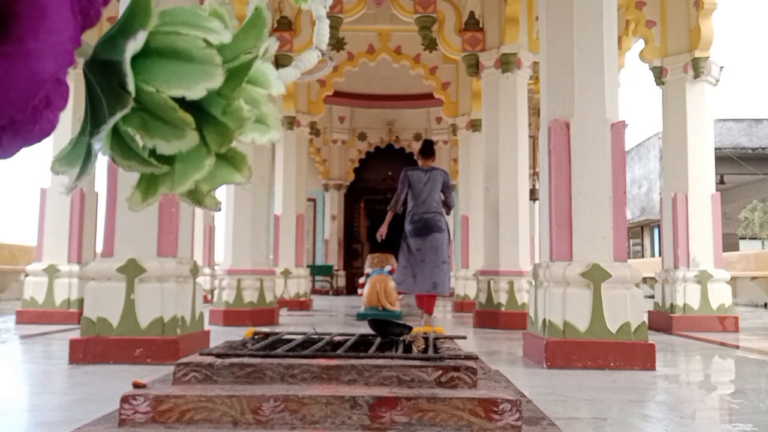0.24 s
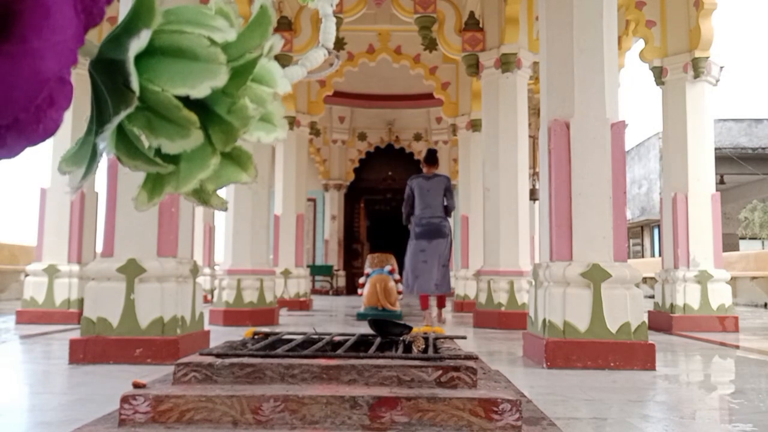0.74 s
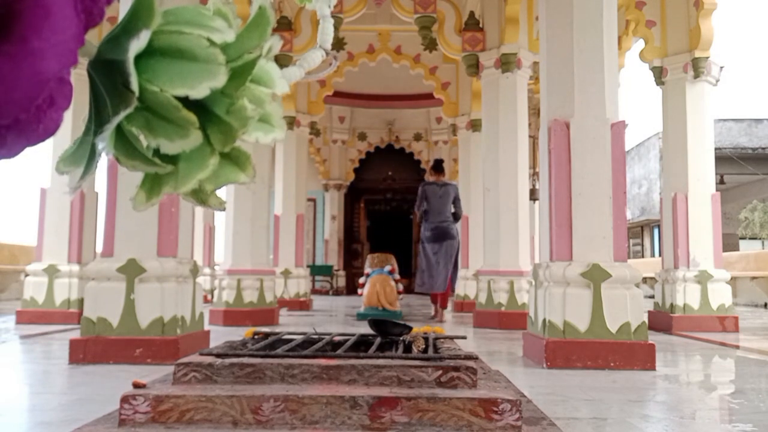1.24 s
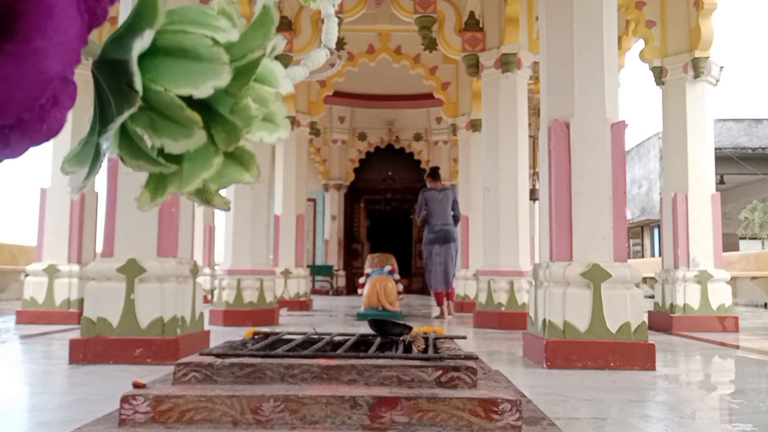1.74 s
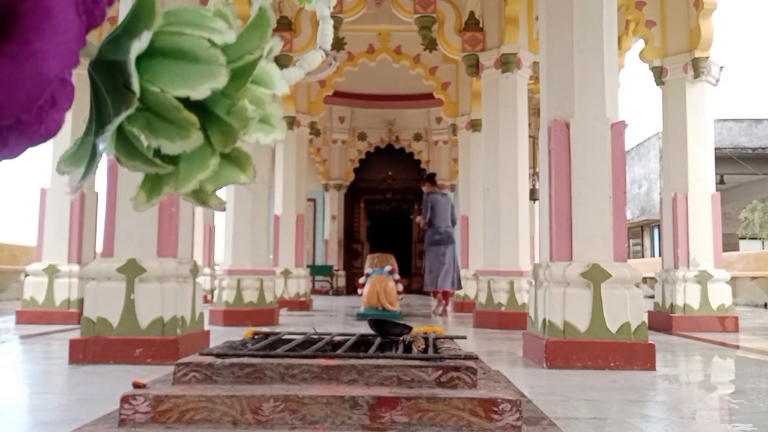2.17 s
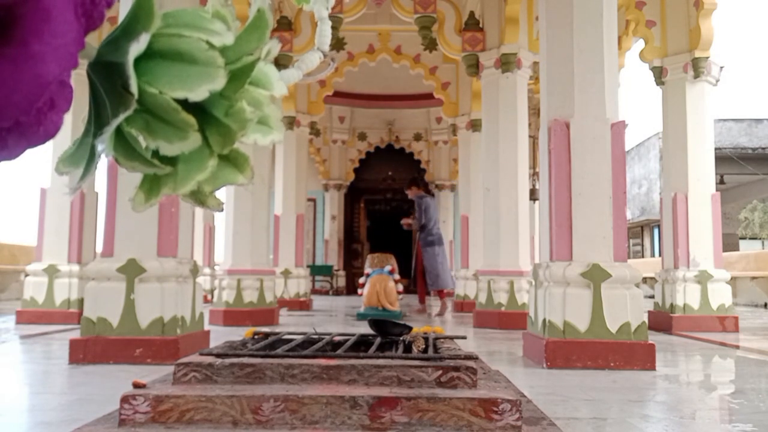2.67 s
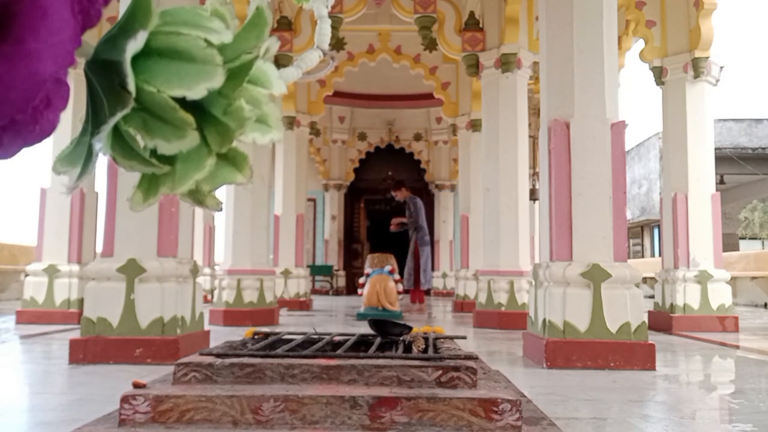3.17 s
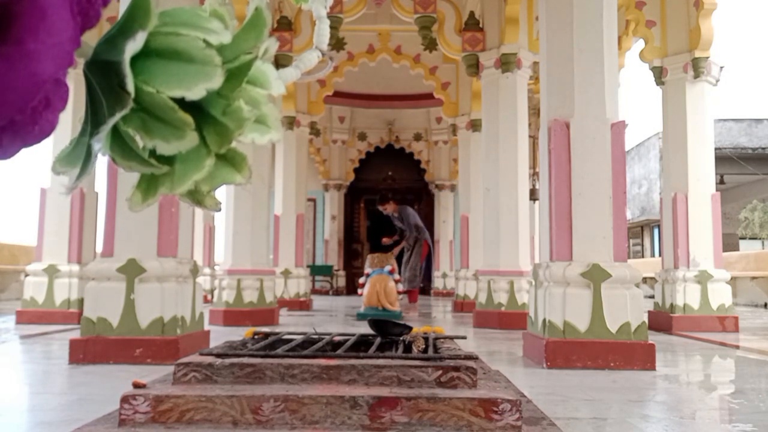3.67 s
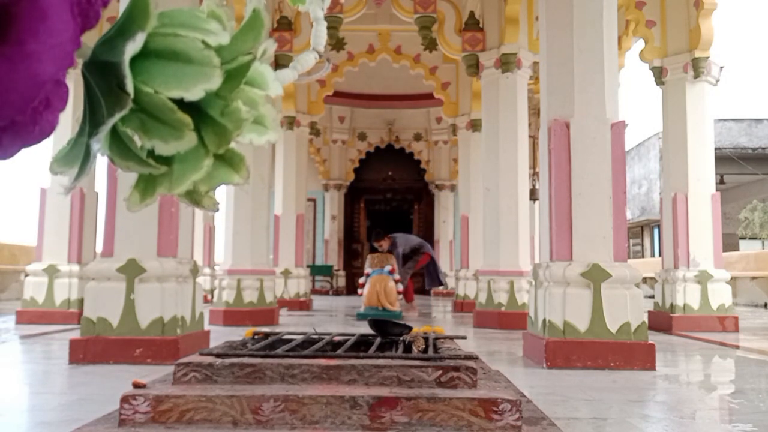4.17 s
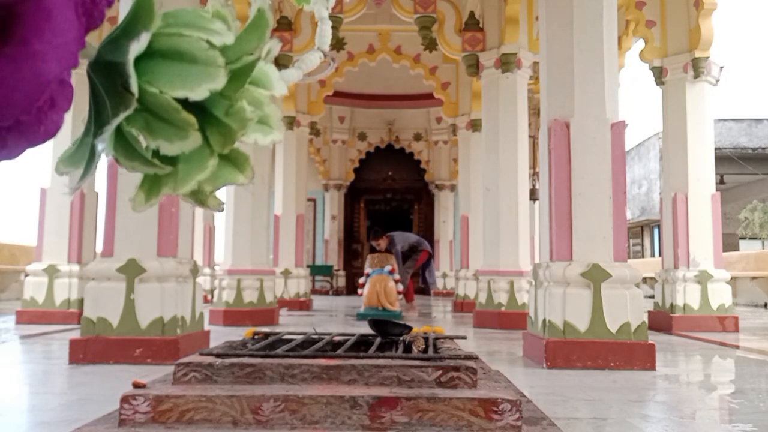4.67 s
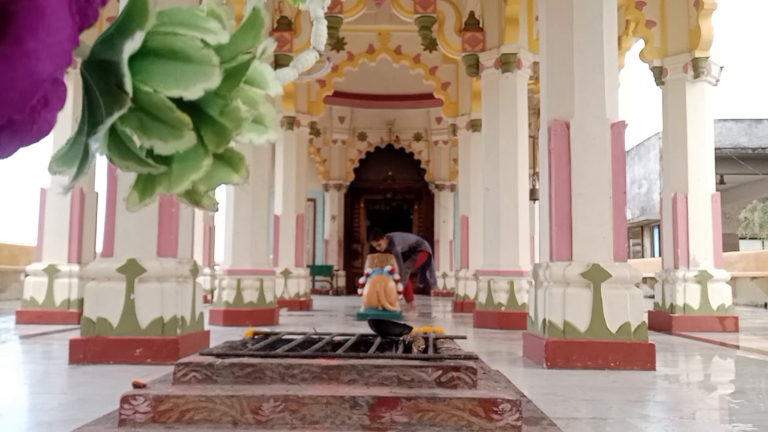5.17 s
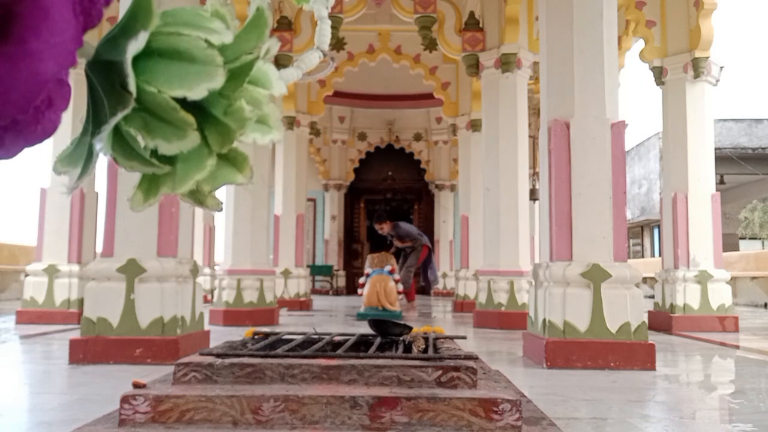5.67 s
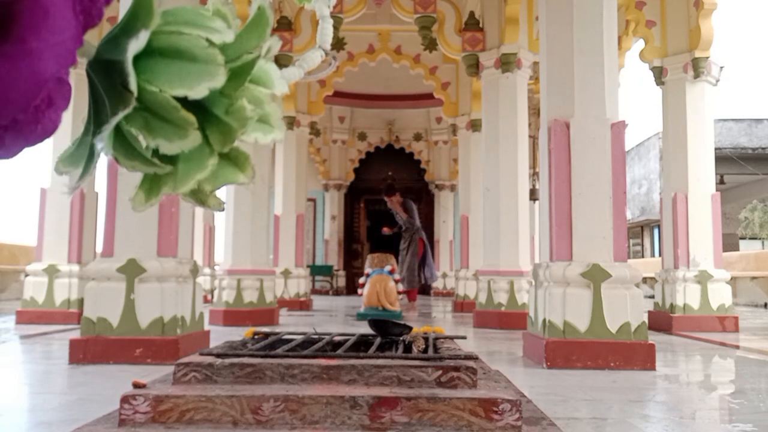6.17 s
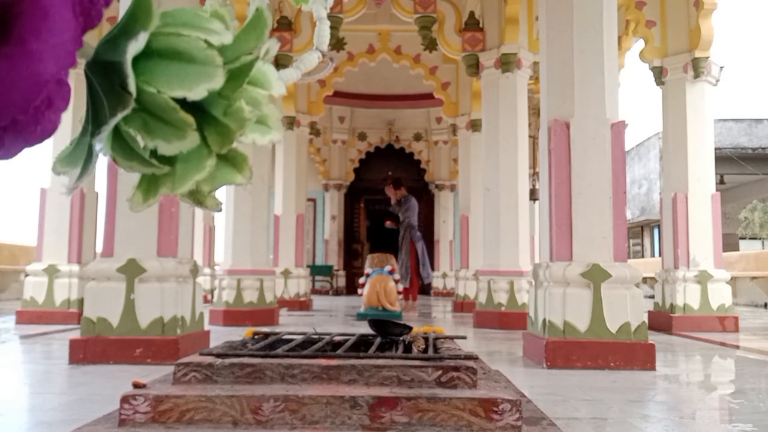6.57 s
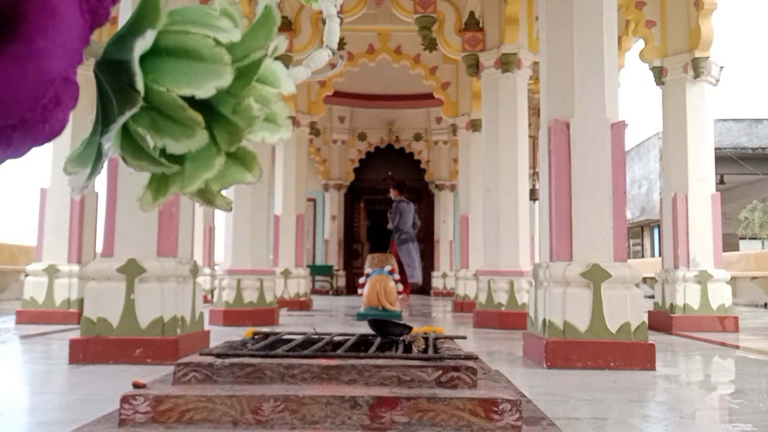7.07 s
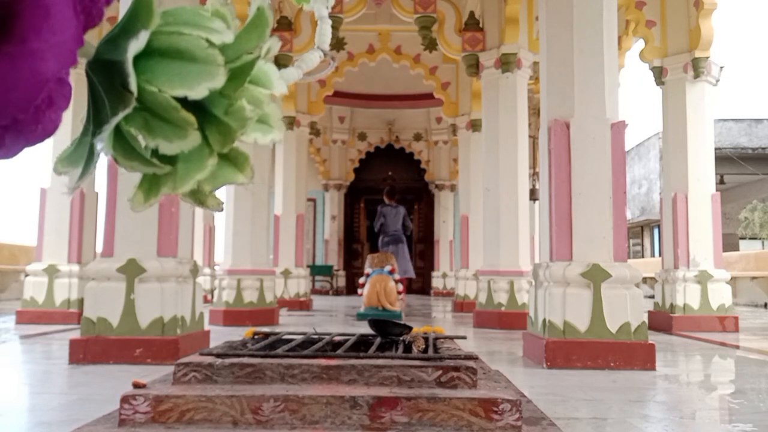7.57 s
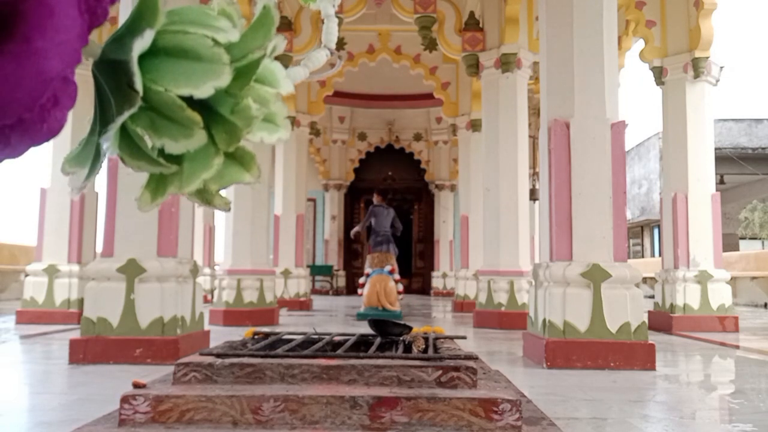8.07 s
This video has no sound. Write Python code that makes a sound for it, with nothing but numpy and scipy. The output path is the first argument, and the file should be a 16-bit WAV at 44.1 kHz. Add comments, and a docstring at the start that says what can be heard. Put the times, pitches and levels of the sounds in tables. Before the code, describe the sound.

In an open, pillared stone temple porch, many birds call without pause: short slurred whistles, sharp dry ticks and a harsh screech about once a second. A closer bird sings three quick glides near two and again past five seconds. Far engines hum low beneath soft air, one gathering speed and one slowing; a gentle swish passes near seven seconds. Wide stereo microphone, birds leaning left, with a bright ring.

```python
"""Birds around an open stone porch. From the start two far engines and a roar hum (sine lines, resonant noise) beneath
soft air noise, while slurred whistles (gliding sines) and dry ticks (decaying snaps over a rustle) ring in the vault.
From 0.76 s a harsh call (stacked sines, shaken falling rasp) comes about once a second; at 2.07 and 5.29 s the nearest
bird sings three glides. One engine gathers speed from 4.45 s, the other slows from 4.62 s; a noise swish passes at 7 s."""
import sys
import numpy as np
from scipy import signal
from scipy.fft import rfft, irfft
from scipy.io import wavfile
from scipy.ndimage import map_coordinates

SR = 44100
rng = np.random.default_rng(int(sys.argv[2]) if len(sys.argv) > 2 else 0)


def wrap_up_sound(samples):
    """Save the sound to the file named by the first command line argument, as 16-bit audio."""
    columns = np.atleast_2d(samples).T
    # keep every value between -1 and 1, then stretch to whole-number steps
    tamed = np.clip(columns, -1, 1)
    steps = np.round(tamed * 32767).astype(np.int16)
    wavfile.write(sys.argv[1], SR, steps)


N = 366471
T = np.arange(N) / SR

# spectrum of the outdoor air: (f/Hz, density level/dB)
AIR_SPECTRUM = [(25, -35), (50, -4.5), (90, 0.5), (150, 4), (240, -11.5), (500, -16), (700, -17.5),
                (1100, -15), (1500, -21.5), (2150, -17.5), (5700, -29), (8800, -43), (11200, -59),
                (15000, -65)]
# swell of the outdoor air before its common lift: (t/s, level/dB)
AIR_SWELL = [(0.0, -57), (2.08, -57), (2.42, -54), (3.54, -54), (4.77, -49), (4.79, -55), (5.89, -57.5),
             (5.95, -63.5), (6.8, -57)]
# course of the swish: (t/s, level/dB)
SWISH_COURSE = [(6.9, -67), (7.08, -42), (7.25, -38.5), (7.38, -43.5), (7.6, -49.5)]
# spectrum of the swish: (f/Hz, density level/dB)
SWISH_SPECTRUM = [(100, -23), (280, 2.5), (700, 2.5), (1450, -0.5), (1650, 4), (1800, 5), (2500, -1.5),
                  (5000, -7), (9000, -17), (12000, -50)]

# far engine that holds its speed, then lets off: (t/s, level/dB)
CRUISING_COURSE = [(0.0, -59), (0.04, -45.5), (0.93, -56), (0.97, -47), (2.71, -54), (3.82, -38.5),
                   (4.91, -42), (4.949, -65), (5.2, -79)]
# second engine that idles, then gathers speed: (t/s, level/dB)
SPEEDING_COURSE = [(0, -67), (2.8, -50), (4.6, -80), (5.6, -46), (6.0, -59), (7.0, -58.5), (7.8, -39.5),
                   (8.05, -49.5), (8.31, -49)]
# lines of each engine from the fifth multiple of its cycle rate upwards: (relative level/dB)
CRUISING_LINES = [-9.5, -34, -10, 4.5, -12.5, -23, -26]
SPEEDING_LINES = [4, 5.5, 3, -13, -12.5, -11.5, -9.5]
# cycle rates in Hz, their changes in Hz per second, and when those begin in s
CRUISE_HZ, CREEP_HZ_PER_S, LETS_OFF_S, SLOWING_HZ_PER_S = 17.5, .085, 4.62, 2.1
IDLE_HZ, PULLS_AWAY_S, GATHER_HZ_PER_S = 17.65, 4.45, 2.23
# swell of the traffic roar, of which only the swings count: (t/s, level/dB)
ROAR_SWELL = [(0.0, -55), (0.02, -54), (2.52, -49), (2.69, -54.5), (4.84, -46), (4.94, -57), (6.9, -69)]
# resonances of the roar, bass and above: (f/Hz, width/Hz, relative level/dB)
ROAR_BASS_MODES = [(70, 6.6, -0.5), (139.5, 43, 6.5)]
ROAR_UPPER_MODES = [(467.4, 37, 0), (524, 33, -3.5), (600, 22, -7), (885, 74, -12.5)]

# first echoes of floor, pillars and vault: (delay t/s, relative level/dB)
FIRST_ECHOES = [(.0096, -17), (.0154, -8), (.0173, 0), (.0397, -13)]
# ring of the porch, before it is stretched for each source: (f/Hz, fall by 60 dB t/s)
PORCH_RING = [(1000, 0.44), (2500, 0.96), (5000, 0.57), (8000, 0.54), (12000, 0.43)]
WALL_HZ = 9300  # where stone and air begin to dull the treble
PILLAR_ECHO_S, PILLAR_ECHO_DB = .047, -10

# sharp ticks: (t/s, relative level/dB, f/Hz, share sent into the ring/dB)
TICK_EVENTS = [(0.0364, -22.5, 4640, 1), (0.2833, -32, 5840, -1), (0.3521, -22, 6240, -1.5),
               (0.512, -35, 6500, -12), (0.576, -20.5, 5770, -1), (0.724, -27, 6600, 0.5),
               (.977, -26, 5860, -1), (1.094, -26.5, 6140, 1), (1.2065, -32.5, 6000, -11),
               (1.88, -24, 5330, -3), (1.9499, -31.5, 4080, 7), (2.021, -42.5, 5430, 8.5),
               (2.1844, -23, 7900, -4.5), (2.3166, -32, 7700, -2.5), (2.577, -37.5, 5600, 5.5),
               (2.6663, -34, 6000, 1), (2.689, -30, 7500, -19), (2.803, -41, 4900, -6),
               (3.044, -28.5, 5540, -4.5), (3.1066, -31, 5470, 0.5), (3.1538, -30, 5960, -1.5),
               (3.406, -36, 7260, 0), (3.723, -32, 7700, -6), (3.7408, -32, 6150, -1),
               (3.776, -31.5, 5600, -1), (3.8506, -36.5, 5970, 1), (3.9849, -30, 5700, 1.5),
               (4.1239, -24.5, 4400, -0.5), (4.32, -25, 5360, -1.5), (4.337, -26.5, 6600, -17),
               (4.6, -27.5, 5060, -4), (4.6747, -22, 6050, -1), (5.0518, -24, 4860, -1.5),
               (5.333, -17.5, 6200, -1.5), (5.4553, -27, 6340, 2), (5.8263, -28.5, 4700, -7),
               (6.0861, -33, 6300, -2), (6.148, -31.5, 5960, -2), (6.3088, -28, 5600, -3.5),
               (6.4814, -35.5, 6260, -6), (6.5502, -24.5, 6900, -2), (6.6082, -23, 5570, -4),
               (6.6642, -37, 5000, 9), (6.718, -27.5, 6600, -2), (6.771, -24.5, 9300, -3.5),
               (6.9196, -32.5, 4830, -2), (6.9883, -40, 6100, 6), (7.1994, -28, 5400, -3),
               (7.256, -23.5, 7100, -4), (7.514, -19, 6800, 0.5), (7.8048, -25.5, 4800, -5),
               (8.034, -38, 5550, -15), (8.2748, -30.5, 6100, -5)]
# harsh calls: (t/s, relative level/dB, f/Hz, upper voice f/Hz, held voices over the falling rasp/dB)
CALL_EVENTS = [(0.756, -47.5, 4970, 5250, 1.5), (1.71, -41, 4966, 5360, -0.5),
               (2.663, -44, 4930, 5410, -3.5), (4.021, -42.5, 4944, 5270, -2.5),
               (5.028, -46.5, 4864, 5220, -.5), (6.109, -48, 5000, 5240, 0.5), (7.03, -49, 5100, 5500, 0.5)]
# falling rasp of one call: (t/s from its start, pitch over the call's pitch, level/dB, rasp 0-1)
CALL_FALL = [(0, .96, -14, .6), (.016, .97, -7, .5), (.04, .94, -7, .8), (.06, .83, -4, 1),
             (.08, .81, -2, .8), (.135, .84, -2, .9), (.17, .83, -8, .7)]
# held voices of a call: (pitch over the call's pitch, entry t/s, length t/s, level/dB, unsteadiness of pitch)
HELD_VOICES = [(1, 0, .125, 0, .009), (.96, 0, .11, -7, .03), (.937, .08, .09, -4, .011),
               (.87, .085, .085, -5, .014), (.81, .065, .08, -6, .017), (.755, .07, .08, -9, .025),
               (1.31, 0, .13, -10, .035)]

# single whistles: (t/s, length t/s, middle f/Hz, glide/octaves, relative level/dB, rasp 0-1)
WHISTLE_NOTES = [(.004, 0.051, 2310, .18, -34, 0.87), (0.025, .028, 2295, .09, -25, 0.4),
                 (0.072, 0.019, 2880, -0.22, -32, 0.2), (.085, 0.074, 2740, -0.03, -40, 0.03),
                 (0.17, 0.042, 2760, 0, -38, 0.07), (0.215, 0.0096, 2605, -0.56, -23.5, 0),
                 (.221, 0.013, 2155, -.02, -26, 0.14), (.236, .065, 2360, .08, -45, 0.77),
                 (0.344, 0.036, 2100, .25, -42, 0.7), (.375, 0.041, 2030, -0.134, -49, 0.42),
                 (0.651, 0.015, 3520, 0, -44, 0.08), (.69, 0.036, 3500, 0, -46, 0.2),
                 (1.012, 0.046, 1860, -0.11, -49, 0.14), (1.195, 0.035, 2750, -0.03, -56, 0),
                 (1.236, 0.035, 2194, 0.32, -46.5, .3), (1.403, 0.031, 2440, -.25, -55, 0.25),
                 (1.447, 0.05, 1950, -.1, -43.5, .2), (1.491, 0.062, 2210, -0.28, -52.5, .5),
                 (1.531, 0.047, 1937, .02, -45, 0.26), (1.483, 0.31, 4730, 0, -55, 0.11),
                 (1.853, 0.039, 2282, .16, -43, 0.4), (1.94, 0.22, 4800, -0.048, -56.5, 0.15),
                 (2.212, 0.028, 2320, .15, -40, 0.24), (2.467, 0.036, 2320, -.12, -37, 0.37),
                 (2.523, 0.013, 2720, .3, -24, 0.51), (2.548, 0.0097, 3230, .3, -30.5, .05),
                 (2.57, 0.021, 2750, .2, -57, 0.07), (2.594, 0.021, 3220, -0.17, -38, .2),
                 (3.001, 0.026, 2505, 0.26, -29.5, 0), (3.194, 0.079, 1963, .039, -43, 0.08),
                 (3.195, 0.038, 1790, 0.075, -40, 0.08), (3.423, 0.037, 2370, -0.078, -26, 0.09),
                 (3.454, 0.038, 1940, -0.071, -46, 0.73), (3.481, 0.14, 2930, 0.42, -48, 0.55),
                 (3.645, 0.12, 2350, -0.18, -42, 0.57), (3.875, 0.062, 3372, 0.11, -42.5, 0.57),
                 (3.935, 0.057, 3635, -.01, -44, 0.2), (4.032, 0.0436, 2500, 0.22, -25.5, 0.41),
                 (4.074, 0.053, 2670, 0.087, -36, 0.4), (4.497, 0.14, 2000, 0.11, -49.5, 0),
                 (4.604, 0.082, 2600, 0.5, -39, 0.37), (4.711, .027, 3280, -.03, -34, 0.13),
                 (4.754, 0.03, 3270, -0.017, -51, 0.02), (4.726, 0.071, 2090, -0.13, -44.5, 0.4),
                 (4.917, 0.033, 1770, 0.1, -45, 0.14), (5.085, 0.046, 2100, 0.3, -49, .1),
                 (5.193, 0.019, 3290, -0.019, -44, 0.1), (5.212, .011, 2700, -0.37, -40, .03),
                 (5.574, 0.047, 2090, -.04, -35, .3), (6.185, 0.048, 3070, .091, -51, 0.5),
                 (6.378, 0.08, 2220, 0.14, -54, 0.8), (6.488, .045, 2950, -.16, -51, 0.26),
                 (6.827, 0.087, 1960, 0.15, -47.5, 0.14), (6.885, 0.073, 2850, -0.0099, -55.5, 0.06),
                 (7.067, 0.029, 2470, 0, -28.5, 0.01), (7.127, 0.25, 1644, -0.046, -50.5, .1),
                 (7.452, 0.051, 2480, 0.45, -37, 0.3), (7.517, 0.032, 2500, 0.28, -48, .4),
                 (7.567, .038, 2170, -.2, -34, 0.54), (7.61, 0.048, 2120, -0.29, -31, 0.6),
                 (7.671, 0.046, 1976, -0.071, -38, 0.18), (7.664, .15, 2355, -.15, -54, 0.7),
                 (7.725, 0.048, 1860, -0.063, -42, 0), (7.803, 0.032, 2050, -.2, -28.5, 0.45),
                 (7.857, 0.037, 2044, .15, -55, 0), (7.98, .035, 2780, .03, -57, 0.1),
                 (8.024, 0.029, 2575, .01, -43, 0.03), (8.048, 0.015, 2335, -.02, -37, 0),
                 (8.056, 0.0095, 2515, .24, -45, 0.2), (8.14, 0.037, 2350, -.1, -54, 0.3),
                 (8.173, 0.071, 2080, -0.038, -45.5, 0.17), (8.221, .018, 2330, 0.37, -38, 0.13),
                 (8.255, .05, 2200, -0.3, -57, .4)]
BEND = 0.091  # a glide lingers at its low end by this share of its span
# the three figures of the nearest bird's song: (t/s into the figure, f/Hz, level/dB)
OPENING = [(0, 2700, -15), (.012, 2760, -6), (.022, 2600, 1), (.032, 2330, -1), (.04, 2700, 1),
           (.046, 3250, -8), (.05, 3350, -18)]
DROP = [(0, 3050, -14), (.005, 2800, -3), (.01, 2450, 1), (.019, 2200, -3), (.029, 2080, -8),
        (.042, 1850, -16)]
SWEEP = [(0, 2400, -8), (.006, 2270, 0), (.011, 2800, -2), (.018, 3300, -9), (.03, 2990, -7),
         (.052, 2770, -1), (.072, 2600, 0), (.098, 2380, -5), (.122, 2260, -14)]
# syllables of the song: (t/s, figure, stretch in time, width of the glides, level/dB)
SYLLABLES = [(2.066, OPENING, 1, 1, -28), (2.250, DROP, 1, 1, -29.5), (2.347, SWEEP, 1, 1, -30),
             (5.294, OPENING, 1.05, .9, -30.5), (5.478, DROP, 1, 1.05, -28.5),
             (5.545, SWEEP, 1.02, .75, -27)]
SONG_HZ = 2400  # pitch about which the song's glides are widened or narrowed

# colour of the two microphone ports: (f/Hz, level/dB)
LEFT_COLOUR = [(400, 0), (1200, -1), (2400, 2.5), (4500, 5), (6500, 6), (7600, 6.5), (9000, -20),
               (11000, -18.5), (15000, -21)]
RIGHT_COLOUR = [(400, 0), (1200, -3), (2400, -1), (4500, 3.5), (6500, -1.5), (8600, 5.5), (9600, 1),
                (11000, -6.5), (15000, -20)]
TOP_HZ = 15700  # nothing above this is let through


def undb(db):
    """Decibels to gain."""
    return 10 ** (np.asarray(db) / 20)


def unit(x):
    """Scale to rms 1."""
    return x / np.sqrt(np.mean(x ** 2) + 1e-20)


def curve(rows):
    """Second column of a table joined by straight lines in time."""
    rows = np.array(rows)
    return np.interp(T, rows[:, 0], rows[:, 1])


def shape(x, gain):
    """Filter by a gain that is a function of frequency."""
    return irfft(rfft(x) * gain(np.fft.rfftfreq(x.shape[-1], 1 / SR) + 1e-3), x.shape[-1])


def colour(x, points):
    """Filter by a spectrum of (f/Hz, level/dB) points."""
    hz, db = np.transpose(points)
    return shape(x, lambda f: undb(np.interp(np.log(f), np.log(hz), db)))


def wander(rate, size):
    """Smooth random drift with a spread near 1, through `rate` random points a second."""
    points = rng.standard_normal(int(size / SR * rate) + 4)
    return map_coordinates(points, [np.arange(size) / SR * rate + 1], order=3, mode="nearest")


def tone(hz):
    """A sine that follows a pitch curve."""
    return np.sin(2 * np.pi * np.cumsum(hz) / SR)


def add(track, start, sound):
    """Mix a sound into a track at a time."""
    i = max(int(start * SR), 0)
    part = sound[:max(N - i, 0)]
    track[i:i + len(part)] += part


def delay(x, seconds):
    """The same sound, later."""
    return np.concatenate([np.zeros(int(round(seconds * SR))), x])[:N]


def porch_tail(build_s, linger):
    """Decaying noise, unlike at the two ports, whose bands die away at their own rates."""
    t = T[:int(1.3 * SR)]
    noise = rng.standard_normal((2, len(t)))
    # single reflections stand out early on, then merge
    sparseness = np.exp(-t / 0.15)
    noise = noise * (np.abs(noise) / np.sqrt(np.pi)) ** sparseness
    hz, t60 = np.transpose(PORCH_RING)
    tail = 0
    for share, decay in zip(np.eye(len(hz)), t60):
        band = shape(noise, lambda f: np.interp(f, hz, share))
        tail = tail + band * np.exp(-np.log(1000) * t / (decay * linger))
    build = 1 - np.exp(-(t / build_s) ** 2)
    return unit(tail * build) / np.sqrt(len(t))


def porch(x, echo_db, ring_db, pan_db, build_s=0.007, linger=1.0, feed=None):
    """Direct sound and first echoes reach the right port first; the diffuse ring differs at the two ports."""
    wall = lambda f: 1 / np.sqrt(1 + (f / WALL_HZ) ** 6)
    dulled = shape(x, wall)
    sent = dulled if feed is None else shape(feed, wall)
    echoes = sum(undb(db) * delay(dulled, s) for s, db in FIRST_ECHOES)
    early = x + undb(echo_db) * echoes
    ports = np.array([delay(early, .00034), early])
    balance = undb(np.array([[pan_db], [-pan_db]]) / 2)  # positive leans left
    ring = signal.fftconvolve(sent[None], porch_tail(build_s, linger), axes=1)[:, :N]
    return ports * balance + undb(ring_db) * ring


def swish():
    """One soft broad pass of coloured noise, independent at the two ports."""
    gate = (T > SWISH_COURSE[0][0]) & (T < SWISH_COURSE[-1][0])
    noise = unit(colour(rng.standard_normal((2, N)), SWISH_SPECTRUM))
    return noise * undb(curve(SWISH_COURSE)) * gate


def outdoors(wide_hz=520, bass_db=-49, bass_hz=200, air_db=12):
    """Noise as a steady far rumble below air that swells and widens towards the treble."""
    mid, side = colour(rng.standard_normal((2, N)), AIR_SPECTRUM)
    side = shape(side, lambda f: np.clip(f / wide_hz, .22, .95))
    air = (mid + side * np.array([[1], [-1]])) / np.std(mid)
    bass = shape(air, lambda f: 1 / (1 + (f / bass_hz) ** 4))
    swell = undb(air_db + curve(AIR_SWELL) + .8 * wander(5, N))
    return undb(bass_db) * bass + swell * (air - bass)


def engine(speed, loudness, orders, unsteady=0.0042, flutter_db=2):
    """Low lines at multiples of a far engine's cycle rate; each flutters on its way through the air."""
    turns = np.cumsum(speed * (1 + unsteady * wander(9, N))) / SR
    lines = np.zeros(N)
    for multiple, db in enumerate(orders, start=5):
        flutter = undb(db + flutter_db * wander(16, N))
        lines += flutter * np.sin(2 * np.pi * (multiple * turns + rng.random()))
    return unit(lines) * undb(curve(loudness))


def resonances(modes):
    """Noise ringing in a few resonances, rms 1."""
    total = np.zeros(N)
    for hz, width, db in modes:
        peak = lambda f: 1 / (1 + ((f - hz) / width * 1.92) ** 2)
        total += undb(db) * unit(shape(rng.standard_normal(N), peak))
    return unit(total)


def roar(low_db=-54, high_db=-54.5, spread=0.36, low_swell=0.91, high_swell=1.13):
    """Resonant traffic noise: central bass that swells less than the more diffuse part above it."""
    level = curve(ROAR_SWELL)
    swell_db = level - level[T < LETS_OFF_S].mean()
    low = resonances(ROAR_BASS_MODES) * undb(low_db + low_swell * swell_db)
    high = resonances(ROAR_UPPER_MODES) + spread * resonances(ROAR_UPPER_MODES) * np.array([[1], [-1]])
    return low + undb(high_db + high_swell * swell_db) * high


def hum():
    """Distant traffic: two droning engines, alike at both ports, and a roar."""
    slowing = SLOWING_HZ_PER_S * np.clip(T - LETS_OFF_S, 0, 1)  # slows for one second
    cruising_hz = CRUISE_HZ + CREEP_HZ_PER_S * T - slowing
    speeding_hz = IDLE_HZ + GATHER_HZ_PER_S * np.maximum(T - PULLS_AWAY_S, 0)
    cruising = engine(cruising_hz, CRUISING_COURSE, CRUISING_LINES)
    speeding = engine(speeding_hz, SPEEDING_COURSE, SPEEDING_LINES)
    return cruising + speeding + roar()


def snap(db, hz, ring_s=.00009, splinter_db=-5):
    """A sine burst a few cycles long, then a softer copy of it a moment later."""
    t = T[:128]
    softness = undb(-.2 * np.clip(db + 18, -15, 0))  # weaker snaps are blunter
    rise = t / (softness * ring_s / 2)
    burst = undb(db) * rise * np.exp(1 - rise) * np.sin(2 * np.pi * hz * t)
    splinter_s = rng.uniform(.0004, .0014)
    return burst + undb(splinter_db) * np.interp(t - splinter_s, t, burst)


def ticks(loud_db=3.14, crackle_count=5, crackle_db=-19, crackle_s=.04,
          grain_count=420, grain_db=-46, grain_range_db=12, grain_hz=6300):
    """Short snaps, each trailed by fainter crackles, over a soft rustle of scattered tiny snaps."""
    loud = [(start, db + loud_db, hz, send_db) for start, db, hz, send_db in TICK_EVENTS]
    grains = []
    for u, v, w in rng.random((grain_count, 3)):
        grains.append((u * N / SR, grain_db + grain_range_db * (v - .5), grain_hz * 2 ** (w - .5), 0))
    crackles = []
    for start, db, hz, send_db in loud:
        for u, v, w in rng.random((crackle_count, 3)):
            later = start - crackle_s * np.log(1 - u)  # thinning out after the snap
            crackle_level = db + crackle_db + grain_range_db * (v - .5)
            crackles.append((later, crackle_level, hz * 2 ** (w - .5), send_db))
    out, feed = np.zeros(N), np.zeros(N)
    for start, db, hz, send_db in loud + crackles + grains:
        sound = snap(db, hz)
        add(out, start, sound)
        add(feed, start, undb(send_db) * sound)
    return undb(2.5) * porch(out, echo_db=1.5, ring_db=6, pan_db=0, build_s=.012, feed=feed)


def harsh_calls(rasp_depth=0.062, upper_db=-2):
    """A screech: held, unsteady sines that enter in turn, with a falling tone roughened by fast pitch shake."""
    out = np.zeros(N)
    s, ratio, course_db, rasp = np.transpose(CALL_FALL)
    t = T[:int(s[-1] * SR)]
    for start, db, hz, upper_hz, held_db in CALL_EVENTS:
        shake = rasp_depth * np.interp(t, s, rasp) * wander(900, len(t))
        fall = undb(np.interp(t, s, course_db)) * tone(hz * (np.interp(t, s, ratio) + shake))
        add(out, start, undb(db + 4.5) * signal.windows.tukey(len(t), .1) * fall)
        upper = (upper_hz / hz, .012, .165, upper_db, .011)
        for pitch, enters, length, voice_db, unsteady in [upper] + list(HELD_VOICES):
            size = int(length * SR)
            voice = tone(hz * pitch * (1 + unsteady * wander(500, size)))
            voice = voice * undb(3 * wander(200, size) - 1)
            gain = undb(db + held_db + voice_db)
            add(out, start + enters, gain * signal.windows.tukey(size, .2) * voice)
    return undb(-3.5) * porch(out, echo_db=-32.0, ring_db=3.0, pan_db=9.0, build_s=0.011)


def slur(length, pitches, rasp, waver_hz=25, rasp_hz=260, swell_db_per_s=10, trill_hz=110):
    """One note through three pitches; it swells as it goes, and rasp shakes its pitch."""
    u = np.linspace(0, 1, int(length * SR))
    hz = np.polyval(np.polyfit([0, .5, 1], pitches, 2), u)
    hz = hz + waver_hz * wander(138.4, len(u)) + rasp_hz * rasp * wander(376.0, len(u))
    swell_db = swell_db_per_s * length * (u - .5) + (1.2 + 3 * rasp) * wander(94, len(u))
    swell = signal.windows.tukey(len(u), .35) * undb(swell_db)
    trill = 1 + 0.18 * np.sin(2 * np.pi * (trill_hz * u * length + rng.random()))  # a quick throb
    return swell * trill * tone(hz)


def whistles(near_db=-38):
    """Single slurred notes from the left; the faint ones come from further off, with more ring."""
    near, far = np.zeros(N), np.zeros(N)
    for start, length, hz, octaves, db, rasp in WHISTLE_NOTES:
        glide = octaves * np.array([-.5, 0, .5]) + BEND * abs(octaves) * np.array([1, 0, 1])
        note = undb(db) * slur(length, hz * 2 ** glide, np.clip(rasp, 0, 1))
        closeness = .5 + .5 * np.tanh((db - near_db) / 6)
        add(near, start, closeness * note)
        add(far, start, (1 - closeness) * note)
    close = porch(near, echo_db=-13, ring_db=-1.5, pan_db=5.5, build_s=.016, linger=.87)
    distant = porch(far, echo_db=-12, ring_db=1.5, pan_db=8, build_s=.014, linger=.91)
    return undb(-10.0) * close + undb(-1.0) * distant


def song(quiver=0.02, flutter_db=-0.5):
    """The nearest bird sings three gliding strokes, twice, from the left; a far pillar repeats each one."""
    out = np.zeros(N)
    for start, figure, stretch, span, db in SYLLABLES:
        s, hz, course_db = np.transpose(figure)
        t = T[:int(s[-1] * stretch * SR)] / stretch
        glide = SONG_HZ * (np.interp(t, s, hz) / SONG_HZ) ** span
        pitch = glide * (1 + quiver * wander(400, len(t)))
        swell = undb(db + np.interp(t, s, course_db) + flutter_db * wander(220, len(t)))
        add(out, start, signal.windows.tukey(len(t), .08) * swell * tone(pitch))
    heard = out + undb(PILLAR_ECHO_DB) * delay(out, PILLAR_ECHO_S)
    # the ring is fed without the pillar's echo
    return porch(heard, echo_db=-13, ring_db=-1, pan_db=5.5, build_s=.01, linger=.82, feed=out)


def scene():
    """All sources together, from the background to the nearest bird."""
    return outdoors() + swish() + hum() + ticks() + harsh_calls() + whistles() + song()


def record(dry):
    """Each port has its own treble resonance; the top is cut."""
    heard = np.array([colour(dry[0], LEFT_COLOUR), colour(dry[1], RIGHT_COLOUR)])
    return signal.sosfilt(signal.ellip(8, .2, 70, TOP_HZ, fs=SR, output="sos"), heard)


dry = scene()
out = record(dry)
wrap_up_sound(out)
```